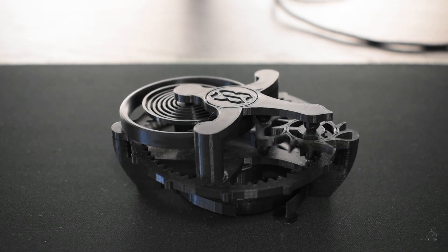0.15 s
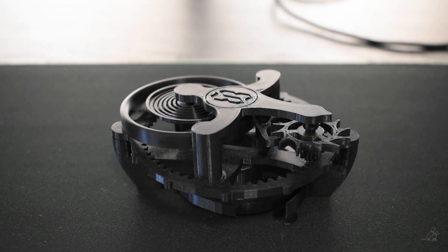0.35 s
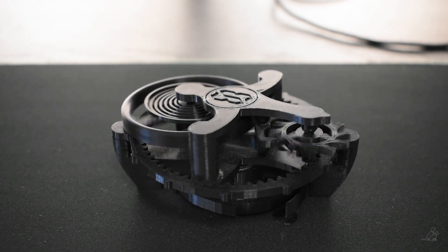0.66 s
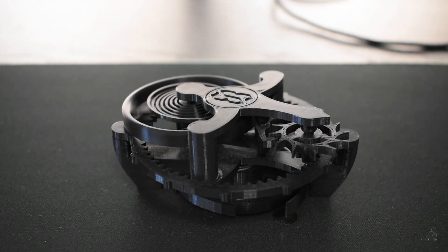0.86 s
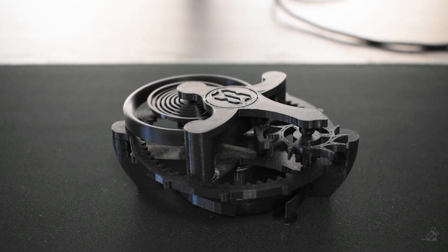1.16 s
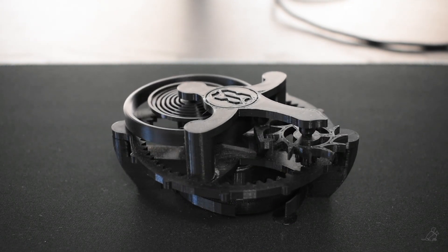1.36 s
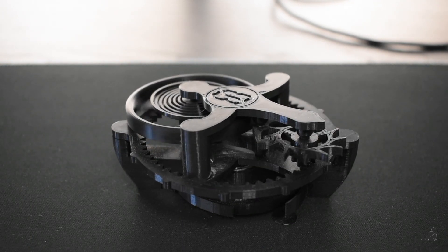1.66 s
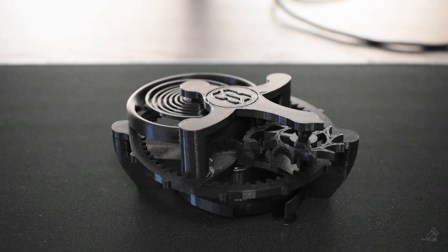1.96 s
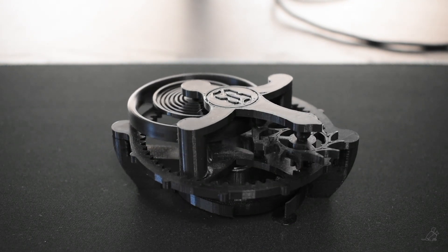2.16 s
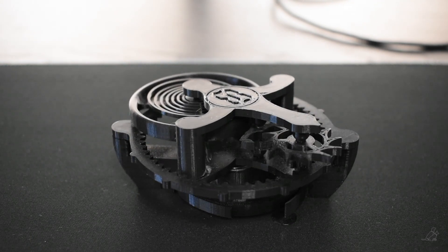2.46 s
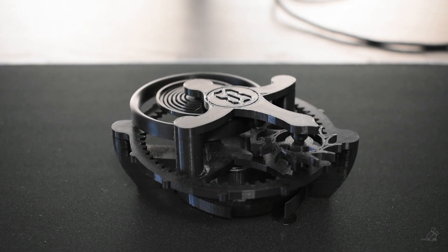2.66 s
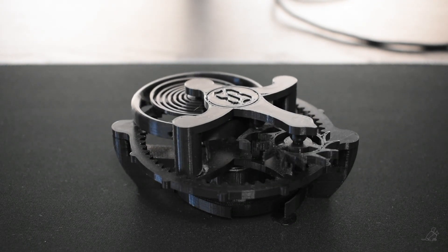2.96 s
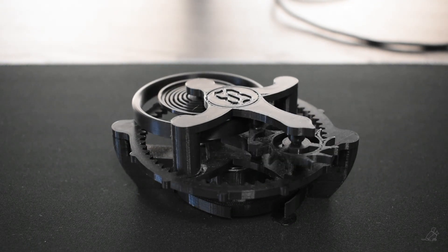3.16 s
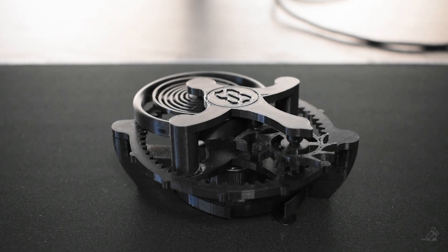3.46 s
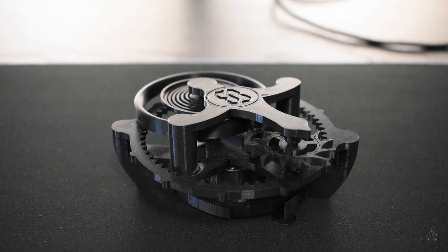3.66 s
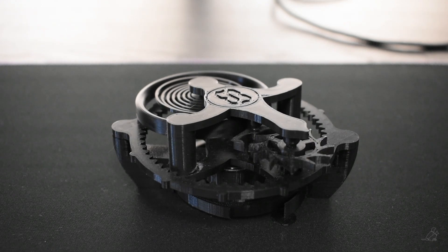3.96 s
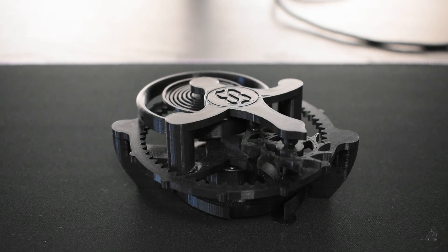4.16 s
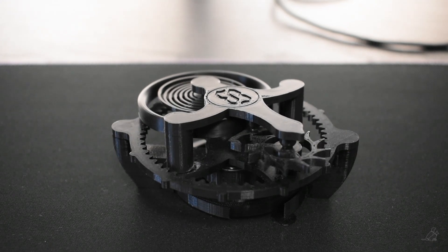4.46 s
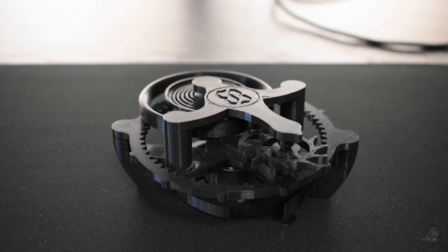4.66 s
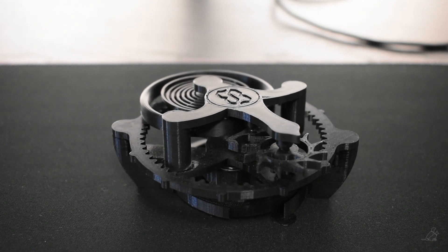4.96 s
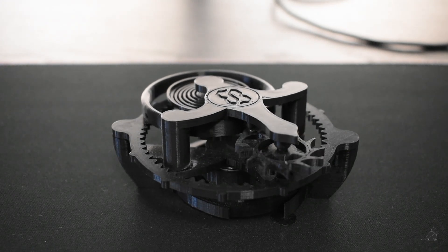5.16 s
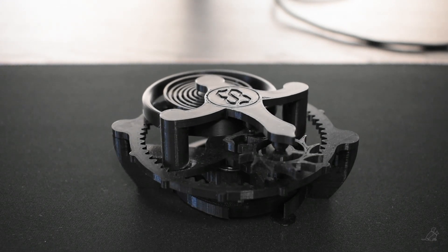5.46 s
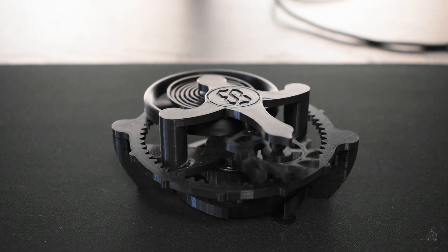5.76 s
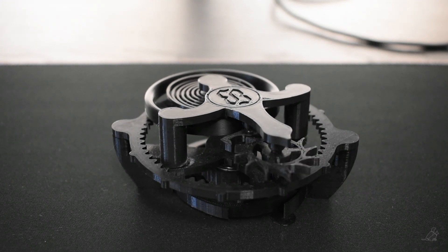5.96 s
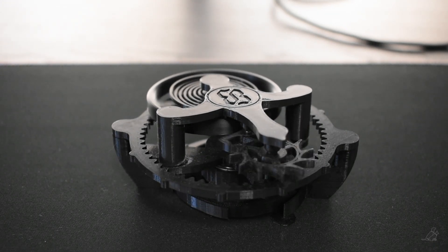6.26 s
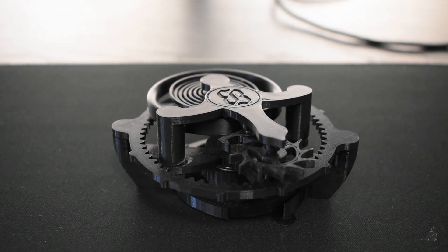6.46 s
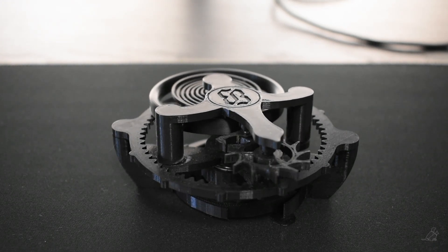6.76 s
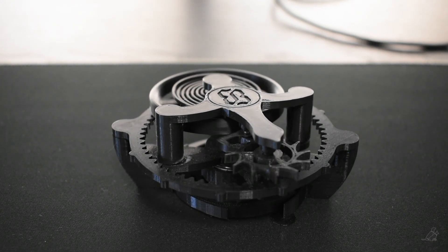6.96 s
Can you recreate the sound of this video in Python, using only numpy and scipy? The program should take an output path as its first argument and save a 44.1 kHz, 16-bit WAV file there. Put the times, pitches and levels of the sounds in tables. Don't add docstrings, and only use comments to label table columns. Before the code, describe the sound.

Dry, sharp tick-tock of a little plastic escapement on a desk mat, each beat with faint pre-clicks, steady soft hum and hiss behind.

```python
import sys
import numpy as np
from scipy import signal
from scipy.fft import rfft, irfft, next_fast_len
from scipy.io import wavfile
from scipy.ndimage import uniform_filter1d

SR = 44100
rng = np.random.default_rng(int(sys.argv[2]) if len(sys.argv) > 2 else 0)


def store_wav(level_fs):
    pcm = np.round(np.clip(np.atleast_2d(level_fs), -1, 1) * 32767)
    wavfile.write(sys.argv[1], SR, pcm.T.astype(np.int16))


def attenuation_scalar(level_db):
    decades = np.asarray(level_db, float) / 20
    return 10 ** decades


N = 313551
LEAD_SAMPLES = 2000
LONG = N + LEAD_SAMPLES

# frequency
# in Hz, level in dB, t60 in seconds.
BODY_MODES = [(1104, -4, 0.04), (1575, 3.5, 0.0073), (1977, -5, 0.018), (2310, 8, 0.0051),
              (2975, -1.5, 0.017), (3353, -3, 0.03), (4036, 7, 0.0079), (4645, 3, 0.0068),
              (5354, 3, 0.0054), (5130, -13.5, 0.0085), (5860, -0.5, 0.023), (6100, -0.5, 0.01),
              (6430, 5, 0.0063), (7400, 10, 0.0027), (7150, -4.5, 0.018), (7930, -5, 0.029),
              (8014, -3.5, 0.0075), (8600, -4, 0.016), (9395, 1.5, 0.011), (9755, -2.5, 0.0063),
              (9980, 5.5, 0.0068), (10820, -7, 0.018), (11380, -2, 0.02), (11400, -27.5, 0.026),
              (12300, -8, 0.022), (13470, 0, 0.0064), (13900, -4, 0.0049), (15200, -12, 0.0057),
              (15400, -10, 0.0093)]
BODY_HZ, BODY_DB, BODY_T60_S = np.transpose(BODY_MODES)
GROUP_EDGES_HZ = [1300, 2500, 5000, 7500, 11500]
# frequency in Hz, level in dB, t60 in seconds.
ROOM_TAIL = [(786, 5.5, 0.23), (1470, -8, 0.31), (2580, -8, 0.33), (4140, -8, 0.36), (5980, -10.5, 0.43),
             (8100, -16.5, 0.31), (10300, -17, 0.35), (13900, -16, 0.24), (16000, -72, 0.073)]
# delay in ms, level in dB.
WALL_ECHOES = [(4.6, -17), (8.2, -25), (14.6, -25), (17.5, -24), (21.5, -23), (25.5, -25)]
# frequency in Hz, width in Hz, rms level in dB.
HUM_MODES = [(62.3, 5.9, -64), (117.3, 7.3, -69), (141.8, 20.7, -52), (156.8, 13.5, -62), (208.7, 33, -56),
             (238.5, 20, -70), (262.2, 10.5, -61.5)]
# frequency in Hz, density in dB per Hz.
HISS_SPECTRUM = [(26, -10), (40, -10), (90, -3), (280, -6), (500, -4.5), (700, -10), (2000, -10.5),
                 (4000, -17), (7000, -20.5), (11000, -27), (16000, -36.5)]
# lock in seconds, unlocking in ms before it, push in ms before it.
TICKS = [(0.2256, 32.7, 18), (0.7112, 30.4, 15.5), (1.1982, 31.6, 18.2), (1.683, 31, 16.3),
         (2.1691, 31.2, 20.4), (2.6544, 31.6, 19), (3.1414, 35.7, 21.7), (3.6279, 36.8, 21.8),
         (4.1162, 39.7, 25), (4.6034, 39, 24.6), (5.0933, 41.5, 20), (5.5817, 42.5, 22.2),
         (6.0705, 43.4, 26), (6.558, 40.5, 22.8), (7.0471, 42.2, 23.5)]
# lock in seconds, unlocking and push in ms before it.
TOCKS = [(-0.019, 25, 13), (0.4668, 25, 13), (0.9531, 24.4, 13.5), (1.4384, 24.3, 12.9),
         (1.9239, 23.4, 12.2), (2.4098, 24.4, 14.2), (2.8951, 24.3, 12.9), (3.3817, 25.5, 14.5),
         (3.8684, 26.8, 14.6), (4.3562, 29.2, 17.1), (4.8448, 29.4, 16.6), (5.3335, 31.3, 17.3),
         (5.8233, 31.2, 17.7), (6.312, 31, 16.9), (6.8001, 31.7, 16.7)]
# tick level in dB, tock level in dB,
# drift in dB per second as the carriage turns away, share of the lock's strength (ratio).
LOCK_GROUPS = [
    (-32.5, -29.5, -0.9, 0.11),
    (-27.5, -33, -0.5, 0.33),
    (-28, -27.5, -0.16, 0.077),
    (-19, -20.5, -0.6, 0.5),
]
# strength in dB, extra above 11.5 kHz in dB.
TEETH = [(-10.5, 7.5), (-10, 1), (-10.5, 3), (-8.5, 3), (-9.5, 3), (-6.5, 2), (-9, 4), (-9.5, 3.5),
         (-9.5, 4.5), (-10, 0.5), (-8.5, 0.5), (-9, 0), (-9, 2), (-14, 3), (-10, -1.5), (-8.5, -1),
         (-10.5, 5.5), (-10, 0.5), (-8, 0), (-10.5, 3), (-8.5, 0), (-8, 4.5), (-9, 2), (-9, 2.5), (-8, 3.5),
         (-11, 3), (-6.5, -3), (-7.5, -3), (-9.5, 2), (-10, -3)]
# usual lead in ms, level there in dB,
# level slope in dB per ms more lead, dullness in dB, dullness slope in dB per ms.
TICK_UNLOCK = (30.5, -31, -0.45, -0.5, -0.14)
TICK_REBOUND = (24, -37, -0.62, 10, 0.2)
TICK_PUSH = (16, -32.5, -0.7, -1.5, -1.1)
TOCK_UNLOCK = (23, -30, -0.45, -9, -0.1)
TOCK_PUSH = (12.5, -30.5, -0.9, 5, -2.5)

USUAL_LOCK_DB, HISS_DB = -9.5, -53
REBOUND_SHARE = 0.8
ONE_BLOW_HZ = 4000
DULL_PIVOT_HZ = 6500
TOP_CUT_HZ = 16150


def contacts(times_s, mode_db, spread_s, uneven_db, fall_db, count):
    facing, all_round = np.zeros((2, len(BODY_HZ), LONG))
    step = np.arange(count)
    jitter = .8 * rng.random((len(times_s), count)) * (step > 0)
    late_s = spread_s * (step + jitter) / count
    at = LEAD_SAMPLES + ((times_s[:, None] + late_s) * SR).astype(int)
    at = np.minimum(at, LONG - 1)
    sign_draw, level_draw = rng.standard_normal((2, len(times_s), len(BODY_HZ), count))

    slowness = np.maximum(ONE_BLOW_HZ / BODY_HZ[:, None], 1)
    fade_db = fall_db * slowness * np.maximum(step - 1, 0) / count
    first_db = -8 * (step == 0)
    strength = np.sign(sign_draw) * attenuation_scalar(uneven_db * level_draw - fade_db + first_db)
    strength /= np.sqrt(np.sum(strength ** 2, axis=2, keepdims=True))
    for k in range(len(BODY_HZ)):
        np.add.at(facing[k], at, attenuation_scalar(mode_db[:, k, None]) * strength[:, k])
        all_round[k, at[:, 0]] = attenuation_scalar(mode_db[:, k] + 1.2 * sign_draw[:, k, 0])
    return np.array([facing, all_round])


def locks():
    times_s = np.array(TICKS + TOCKS)[:, 0]
    tooth_db, edge_db = np.transpose(TEETH)[:, :, None]
    tick_db, tock_db, turn_db_per_s, share = np.transpose(LOCK_GROUPS)
    pallet_db = np.r_[[tick_db] * len(TICKS), [tock_db] * len(TOCKS)]
    lower_db = pallet_db + turn_db_per_s * times_s[:, None] + share * (tooth_db - USUAL_LOCK_DB)
    group_db = np.c_[lower_db, tooth_db - 6.5, tooth_db + edge_db - 9]
    mode_db = group_db[:, np.searchsorted(GROUP_EDGES_HZ, BODY_HZ)]
    stop = contacts(times_s - .0004, mode_db, spread_s=.002, uneven_db=1.5, fall_db=28, count=8)
    bank = contacts(times_s - .0024, mode_db - 32, spread_s=.001, uneven_db=3, fall_db=19, count=3)
    return stop + bank


def touch(lock_s, lead_ms, usual_ms, db, db_per_ms, dull_db, dull_db_per_ms):
    extra_ms = lead_ms - usual_ms
    return np.c_[lock_s - lead_ms / 1000, db + db_per_ms * extra_ms, dull_db + dull_db_per_ms * extra_ms]


def fork():
    tick_s, tick_unlock_ms, tick_push_ms = np.transpose(TICKS)
    tock_s, tock_unlock_ms, tock_push_ms = np.transpose(TOCKS[1:])
    return np.r_[touch(tick_s, tick_unlock_ms, *TICK_UNLOCK),
                 touch(tick_s, REBOUND_SHARE * tick_unlock_ms, *TICK_REBOUND),
                 touch(tick_s, tick_push_ms, *TICK_PUSH),
                 touch(tock_s, tock_unlock_ms, *TOCK_UNLOCK),
                 touch(tock_s, tock_push_ms, *TOCK_PUSH)]


def pushes():
    times_s, peak_db, dull_db = np.hsplit(fork(), 3)
    octaves = np.log2(BODY_HZ / DULL_PIVOT_HZ)
    mode_db = peak_db - 7 - np.clip(octaves, -.6, .6) * dull_db
    mode_db = mode_db - 5 * np.maximum(octaves, 0) ** 2 - 3.5 * np.maximum(-octaves, 0)
    return contacts(times_s[:, 0] - .0003, mode_db, spread_s=.003, uneven_db=2, fall_db=22, count=8)


def scrape():
    times_s, peak_db, _ = fork().T
    starts = np.zeros(LONG)
    starts[LEAD_SAMPLES + (times_s * SR).astype(int)] = attenuation_scalar(peak_db - 27)
    drag = signal.lfilter([1], [1, -np.exp(-1 / (0.01 * SR))], starts)
    grains = np.zeros((len(BODY_HZ), LONG))
    hit = rng.random(LONG) < 5000 / SR
    grains[:, hit] = rng.standard_normal((len(BODY_HZ), hit.sum()))
    octaves_up = np.maximum(np.log2(BODY_HZ[:, None] / DULL_PIVOT_HZ), 0)
    return drag * grains * attenuation_scalar(-4 * octaves_up)


def ring(clicks, hz, t60_s):
    radius, angle = attenuation_scalar(-60 / (t60_s * SR)), 2 * np.pi * hz / SR
    poles = [1, -2 * radius * np.cos(angle), radius * radius]
    return signal.lfilter([.5, 0, -.5], poles, clicks + 1e-18)


def escapement():
    facing, all_round = locks() + pushes()
    facing = facing + scrape()
    t60_s = np.minimum(BODY_T60_S, .011 + 40 / BODY_HZ + .02 * (BODY_HZ < 1300))
    edges_hz = np.r_[700, (BODY_HZ[1:] + BODY_HZ[:-1]) / 2, 17000]
    direct = blurred = 0
    for k, (hz, db) in enumerate(zip(BODY_HZ, BODY_DB)):
        direct = direct + ring(facing[k] * attenuation_scalar(db), hz, t60_s[k])
        band = signal.firwin(129, edges_hz[k:k + 2], pass_zero=False, scale=False, fs=SR)
        blurred = blurred + signal.oaconvolve(all_round[k] * attenuation_scalar(11 + db / 3), band)[:LONG]
    no_lows = signal.butter(3, 880, "high", fs=SR, output="sos")
    return signal.sosfilt(no_lows, [direct, blurred])


def at_hz(hz, points, column=1):
    table = np.array(points)
    return np.interp(np.log(np.maximum(hz, 1)), np.log(table[:, 0]), table[:, column])


def room(direct, blurred):
    t = np.arange(SR // 3) / SR
    white = rng.standard_normal((2, 4, len(t)))
    tail = 0
    edges_hz = 600 * 2 ** np.arange(0, 5.1, 1 / 3)
    for k, (low, high) in enumerate(zip(edges_hz, edges_hz[1:])):
        hz = np.sqrt(low * high)
        third_octave = signal.butter(2, [low, high], "band", fs=SR, output="sos")
        decay_db = at_hz(hz, ROOM_TAIL) - 60 * t / at_hz(hz, ROOM_TAIL, column=2)
        tail = tail + signal.sosfilt(third_octave, white[k % 2]) * attenuation_scalar(decay_db)
    tail = tail * attenuation_scalar(-7) * np.clip((t - .002) / 0.00067, 0, 1)

    echoes = np.zeros(SR // 20)
    echoes[0] = 1
    for delay_ms, db in WALL_ECHOES:
        echoes[round(delay_ms * SR / 1000)] = attenuation_scalar(db)

    turn = 2 * np.pi * np.arange(LONG) / SR * np.array([[.9], [.37]])
    path_mix = np.r_[np.cos(turn), np.sin(turn)] / np.sqrt(2)
    sent = (blurred + attenuation_scalar(-27) * direct) * path_mix
    diffuse = signal.fftconvolve(sent, tail, axes=1)[:, :LONG].sum(axis=0)
    return signal.fftconvolve(direct, echoes)[:LONG] + diffuse


def rms_one(x):
    return x / np.sqrt(np.mean(x ** 2))


def hum():
    out = 0
    for hz, width_hz, db in HUM_MODES:
        radius = np.exp(-np.pi * width_hz * 1.5 / SR)
        poles = [1, -2 * radius * np.cos(2 * np.pi * hz / SR), radius * radius]
        once = signal.lfilter([1, 0, -1], poles, rng.standard_normal(N + SR))
        twice = signal.lfilter([1, 0, -1], poles, once)
        out = out + attenuation_scalar(db) * rms_one(twice[SR:])
    return out


def hiss():
    size = next_fast_len(N)
    colour = attenuation_scalar(at_hz(np.fft.rfftfreq(size, 1 / SR), HISS_SPECTRUM))
    noise = irfft(rfft(rng.standard_normal(size)) * colour, size)[:N]
    return attenuation_scalar(HISS_DB) * rms_one(noise)


def scene():
    beats = room(*escapement())[LEAD_SAMPLES:]
    return (beats + hum() + hiss())[None]


def band_limit(x):
    return signal.sosfilt(signal.butter(12, 17080, fs=SR, output="sos"), x)


def record(dry):
    dry = 1.3 * np.tanh(dry / 1.3)
    steep = signal.cheby2(12, 40, TOP_CUT_HZ, fs=SR, output="sos")
    cut = signal.sosfiltfilt(steep, dry)
    top = signal.sosfiltfilt(signal.butter(14, 16450, fs=SR, output="sos"), dry - cut)
    loud = np.clip(uniform_filter1d(np.abs(dry), size=128) / attenuation_scalar(-23) - 1, 0, 1)
    return band_limit(cut + loud * top)


dry = scene()
out = record(dry)
store_wav(out)
```